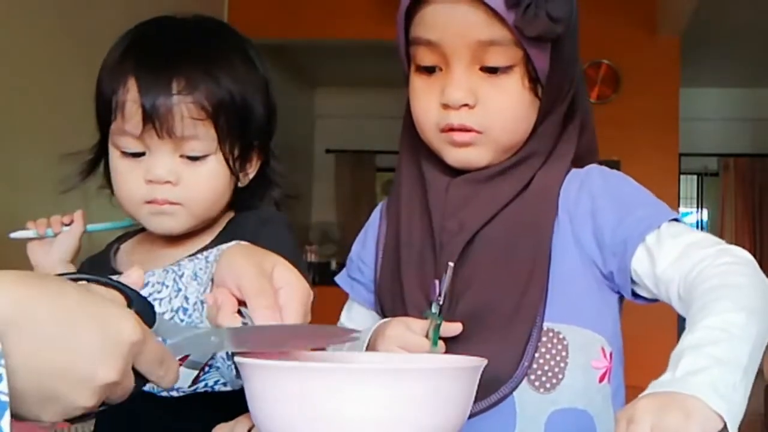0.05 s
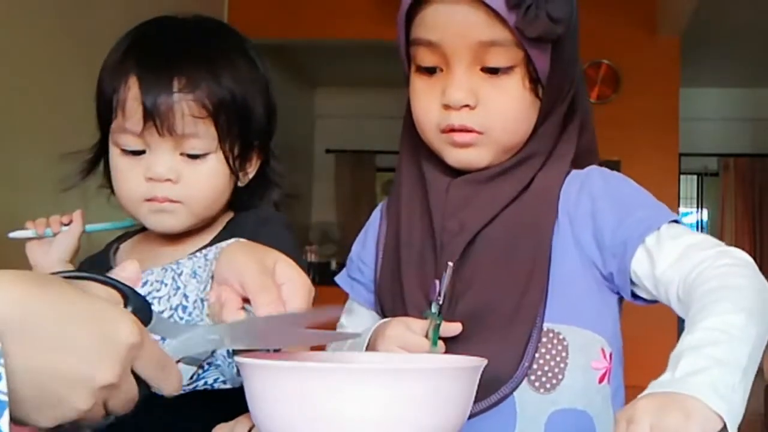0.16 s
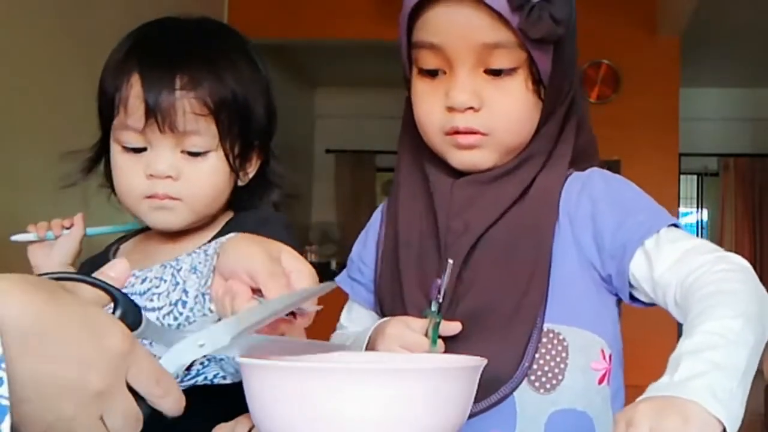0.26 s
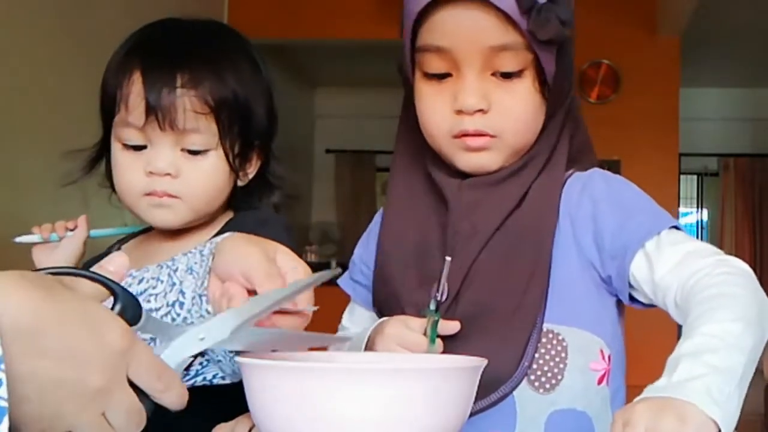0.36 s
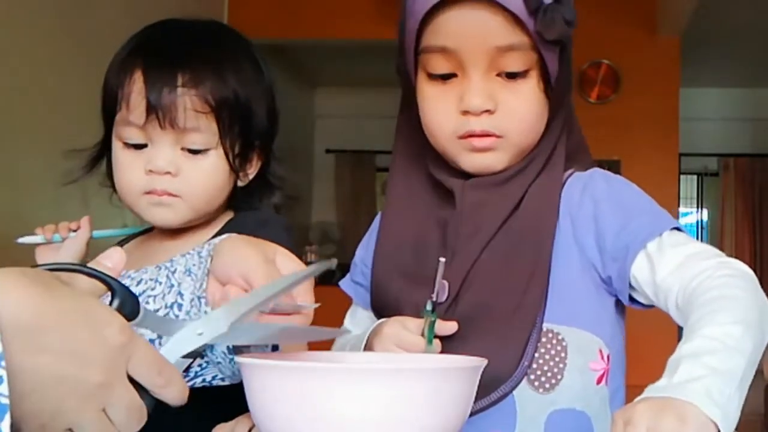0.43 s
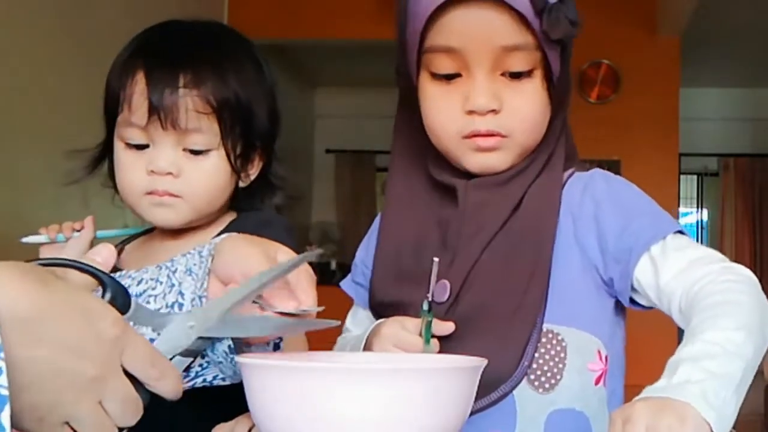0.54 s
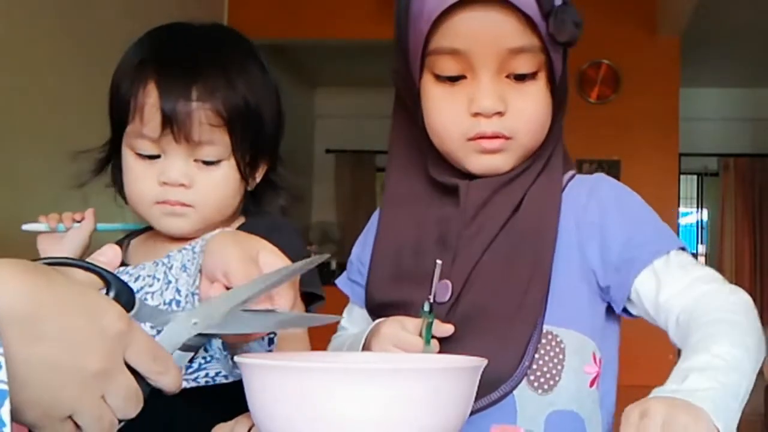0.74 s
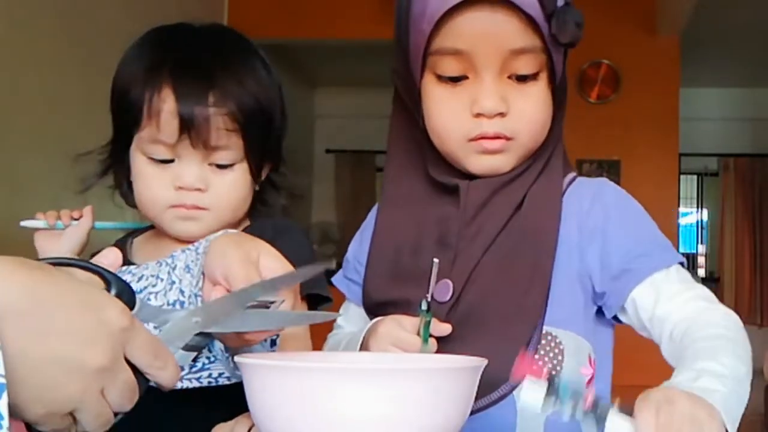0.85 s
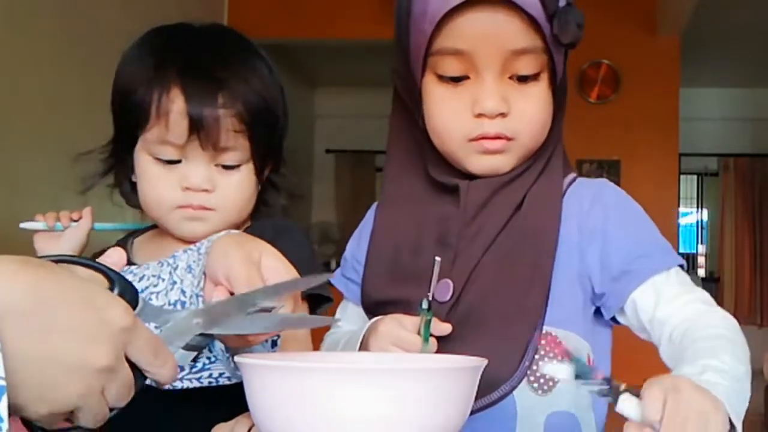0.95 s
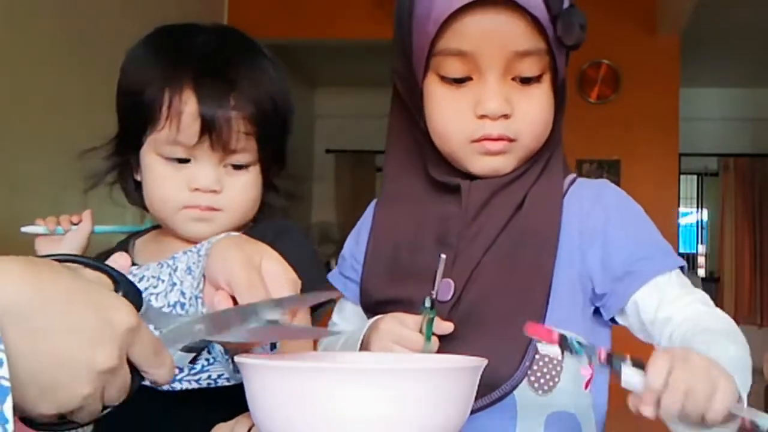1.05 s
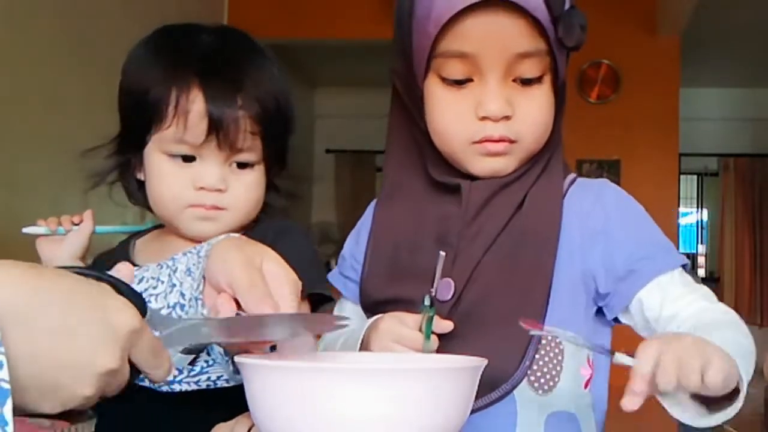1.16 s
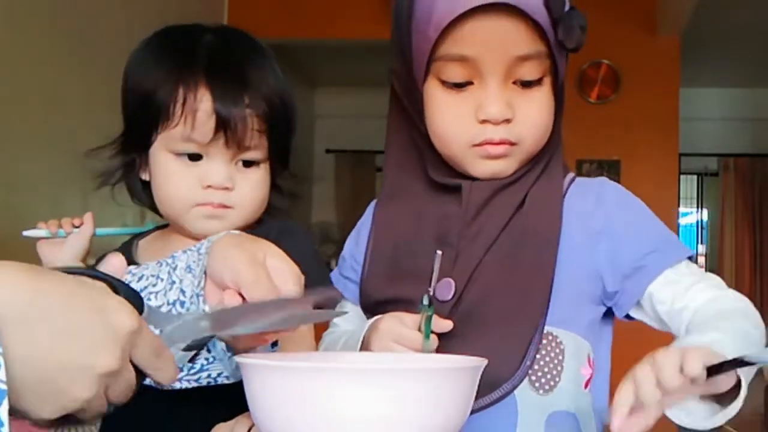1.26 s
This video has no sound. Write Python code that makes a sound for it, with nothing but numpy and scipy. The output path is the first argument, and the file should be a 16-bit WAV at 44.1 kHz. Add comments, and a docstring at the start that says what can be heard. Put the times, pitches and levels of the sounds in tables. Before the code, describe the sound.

Large scissors cut magazine paper close to the microphone: a brief paper brush and blade tick, two very loud, hollow, clipped knocks on the table, then light ticks, sliding and a crisp snip in a hard-walled room.

```python
"""A short brush and a soft bump, a blade tick, then two hard, hollow knocks that overload the microphone.
After them large steel scissors tick, slide along magazine paper and snip it, over a low room rumble.
Knocks are decaying sines plus a noise crack; ticks are noise rasps with a sine ping; paper is random
fibre snaps plus friction noise under stroke envelopes; hand bumps and rumble are coloured noise.
Knocks and scissors feed a diffuse reverberation of a hard-walled room; knocks also get early echoes."""
import sys
import numpy as np
from scipy import signal
from scipy.io import wavfile
from scipy.ndimage import uniform_filter1d

SR = 44100
rng = np.random.default_rng(int(sys.argv[2]) if len(sys.argv) > 2 else 0)


def store_wav(level_fs):
    """Save 16-bit WAV to argv[1]."""
    pcm = np.round(np.clip(np.atleast_2d(level_fs), -1, 1) * 32767)
    wavfile.write(sys.argv[1], SR, pcm.T.astype(np.int16))


N = 57330
T = np.arange(N) / SR
LN_60_DB = np.log(1000)


def from_db(db):
    """Decibels to amplitude gain."""
    return 10 ** (np.asarray(db) / 20)


def at_hz(points, hz):
    """Interpolate a table on a log-frequency axis."""
    f, value = np.transpose(points)
    return np.interp(np.log(hz), np.log(f), value)


def pan(db):
    """Left and right gains for a level difference; positive is louder left."""
    return from_db(np.array([[db], [-db]]) / 2)


def delay(x, s):
    """Shift a sound s seconds later, same length."""
    lag = int(max(s, 0) * SR)
    silence = np.zeros(x.shape[:-1] + (lag,))
    return np.concatenate([silence, x], axis=-1)[..., :N]


def decay(t60_s):
    """Exponential fall by 60 dB in t60_s."""
    return np.exp(-LN_60_DB * T / max(t60_s, 1e-3))


def ring(modes):
    """Decaying sines of a struck object."""
    return sum(from_db(db) * decay(t60) * np.sin(2 * np.pi * hz * T) for hz, db, t60 in modes)


def swell(start_s, peak_s, t60_s):
    """Straight rise, exponential release."""
    rise = np.clip((T - start_s) / max(peak_s - start_s, 1e-3), 0, 1)
    return rise * np.exp(-LN_60_DB * np.maximum(T - peak_s, 0) / t60_s)


BAND_EDGES_HZ = 22 * 2 ** (np.arange(30) / 3)  # third octaves
# stereo correlation: (f/Hz, left-right likeness)
STEREO_LIKENESS = [(60, 0.96), (150, 1), (300, 0.69), (1000, 0.23), (2500, 0), (10000, 0.12)]


def bands(white):
    """Split two mid/side pairs, used in turn, into third-octave stereo bands: (f/Hz, band)."""
    for k, (low, high) in enumerate(zip(BAND_EDGES_HZ, BAND_EDGES_HZ[1:])):
        band_pass = signal.butter(2, [low, high], "band", fs=SR, output="sos")
        mid, side = signal.sosfilt(band_pass, white[k % 2])
        hz = np.sqrt(low * high)
        alike = np.clip(at_hz(STEREO_LIKENESS, hz), -1, 1)
        opposed = side * np.array([[1], [-1]])
        yield hz, np.sqrt(1 + alike) * mid + np.sqrt(1 - alike) * opposed


def noise_bands():
    """Smooth stereo noise in third octaves."""
    return list(bands(rng.standard_normal((2, 2, N))))


def colour(bank, spectrum, tilt_db_per_oct=0):
    """Mix bands to a tilted spectrum, scaled to rms 1."""
    out = sum(from_db(at_hz(spectrum, hz) + tilt_db_per_oct * np.log2(hz)) * band for hz, band in bank)
    return out / out.std()


# blows: (t/s, hollow ring level/dB, crack level/dB, thud level/dB, ring brightness/dB per octave,
#         steel level/dB)
KNOCK_BLOWS = [(0.2165, 2, -6, 1.5, -1, -58), (0.2667, -4, -7, 4.5, -13, -35)]
# hollow ring of the struck object: (f/Hz, level/dB, t60/s)
HOLLOW_MODES = [(666.7, -19.5, 0.089), (788, -19.5, .16), (862.5, -16.5, 0.13), (966, -9, 0.14),
                (1024, -2, 0.05), (1120.3, -6, 0.062), (1233, -6, .07), (1405, -4, .06),
                (1810, -29.5, 0.027), (2020, -20, 0.062), (2700, -31, 0.07), (3130, -27, 0.09),
                (3900, -34, 0.071)]
# thud of the table top: (f/Hz, level/dB, t60/s)
TABLE_MODES = [(86, -34, .55), (163, -32, .45), (235, -31, .12), (308, -26, .25), (317, -32, .55)]
# long ring of the jolted steel: (f/Hz, level/dB, t60/s)
JOLTED_STEEL_MODES = [(3400, -10, .7), (3450, -11, .7), (3505, -5, .5), (4360, 3, .1), (4610, -5, .12),
                      (5790, -13, .25)]
# crack of the contact, relative spectrum: (f/Hz, level/dB per Hz)
CRACK_SPECTRUM = [(100, 5), (500, -3.5), (1200, 5.5), (2500, -5.5), (5500, -12.5), (8000, -29),
                  (12000, -37.5), (16000, -30)]
CRACK_T60_S, THUD_RISE_S, TILT_PIVOT_HZ = 0.045, 0.01, 1000
KNOCK_PAN_DB, KNOCK_RIGHT_LAG_S = 3.5, 0.00012


def knocks():
    """Two blows excite a noise crack, a hollow ring, a low thud and a thin steel ring."""
    crack = colour(noise_bands(), CRACK_SPECTRUM)
    thud = ring(TABLE_MODES) * (1 - np.exp(-T / THUD_RISE_S))
    out = 0
    for s, ring_db, crack_db, thud_db, bright_db, steel_db in KNOCK_BLOWS:
        modes = [(hz, db + bright_db * np.log2(hz / TILT_PIVOT_HZ), t60) for hz, db, t60 in HOLLOW_MODES]
        body = from_db(ring_db) * ring(modes) + from_db(thud_db) * thud
        stereo_body = np.array([delay(body, s), delay(body, s + KNOCK_RIGHT_LAG_S)])
        steel = from_db(steel_db) * delay(ring(JOLTED_STEEL_MODES), s)
        contact = from_db(crack_db) * crack * delay(decay(CRACK_T60_S), s)
        out = out + stereo_body + steel + contact
    return out * pan(KNOCK_PAN_DB)


# early reflections: (left delay t/s, right delay t/s, level/dB)
NEAR_REFLECTIONS = [(.0029, .0034, -14), (.0070, 0.021, -30), (.0096, .0104, -11.5),
                    (0.0134, 0.0079, -19.5)]


def echoes(x):
    """First reflections from the table and nearby things: delayed, weaker copies."""
    return sum(from_db(db) * np.array([delay(x[0], left_s), delay(x[1], right_s)])
               for left_s, right_s, db in NEAR_REFLECTIONS)


# blade ticks: (t/s, rasp level/dB, rasp length/s, rasp t60/s, tilt/dB per octave, pan/dB,
#               ping f/Hz, ping level/dB)
BLADE_TICKS = [(0.0447, -30, .003, .035, 4, -2, 4500, -37), (0.1938, -42, .003, .005, -2, -3, 2550, -32),
               (0.4378, -29, .002, .025, -1, 1, 1400, -32), (0.6024, -46, .003, .04, -2, 3, 3250, -46),
               (0.7662, -39, .002, .012, 0, 2, 3140, -42), (0.8035, -46, .002, .02, 0, 1, 3130, -50),
               (0.8850, -43, .002, .03, 0, 3, 5550, -43), (0.9605, -38, .001, .02, -1, 1, 2600, -42),
               (0.9744, -41, .002, .03, 0, 3, 4760, -37), (1.0968, -31, .005, .03, 1, 4, 3980, -38),
               (1.1497, -39, .002, .012, -3, 3, 2550, -34)]
# steel on steel, relative spectrum: (f/Hz, level/dB per Hz)
RASP_SPECTRUM = [(300, -9), (1500, -2.5), (2800, 17.5), (4200, 13), (7500, 14), (10000, 0), (15000, -5)]
PING_T60_S = 0.02


def ticks():
    """Blades catch on each other: a short noise rasp and a decaying sine ping."""
    bank, out = noise_bands(), 0
    for s, db, length_s, t60, tilt_db, pan_db, ping_hz, ping_db in BLADE_TICKS:
        envelope = np.exp(-LN_60_DB * np.maximum(T - length_s, 0) / t60)
        rasp = from_db(db) * colour(bank, RASP_SPECTRUM, tilt_db) * delay(envelope, s)
        ping = delay(ring([(ping_hz, ping_db, PING_T60_S)]), s)
        out = out + pan(pan_db) * (rasp + ping)
    return out


# strokes along and through the paper: (start t/s, peak t/s, release t60/s, level/dB, tilt/dB per octave)
BLADE_STROKES = [(-0.03, -0.011, 0.25, -36.5, 1.5), (0.80, 0.859, 0.58, -45.5, 0.5),
                 (0.945, 0.957, 0.1, -41.5, 1.5), (1.073, 1.081, 0.18, -36.5, 1),
                 (1.079, 1.103, 0.03, -43.5, 67.5), (1.15, 1.165, 0.42, -44.5, 0.5)]
# paper, relative spectrum: (f/Hz, level/dB per Hz)
PAPER_SPECTRUM = [(200, 10.5), (550, 8), (880, 6.5), (1300, 3.5), (1900, -1), (3300, 1.5), (5300, 3),
                  (7200, -2), (9300, -7)]
FIBRES_PER_S, FIBRE_SPREAD_DB, FRICTION_SHARE = 1500, 4.0, 0.6
PAPER_DULL_HZ, CUTTING_PAN_DB = 9500, 2.0
CATCH_SAMPLES, CATCH_RMS_DB = 180, 2.2  # paper catches and slips on the steel


def cutting():
    """Paper rubs on steel and its fibres snap at random under each stroke."""
    shape = (2, N)
    happens = rng.random(shape) < FIBRES_PER_S / SR
    sign = rng.choice([-1, 1], shape)
    strength = from_db(FIBRE_SPREAD_DB * np.minimum(rng.exponential(1, shape), 4))
    snaps = happens * sign * strength
    rubbing = snaps / snaps.std() + FRICTION_SHARE * rng.standard_normal((2, 2, N))
    low_pass = signal.butter(4, PAPER_DULL_HZ, fs=SR, output="sos")
    bank = list(bands(signal.sosfilt(low_pass, rubbing)))
    catching = uniform_filter1d(rng.standard_normal(N), size=CATCH_SAMPLES)
    catch_gain = from_db(CATCH_RMS_DB * catching / catching.std())
    strokes = sum(from_db(db) * swell(start, peak, t60) * colour(bank, PAPER_SPECTRUM, tilt_db)
                  for start, peak, t60, db, tilt_db in BLADE_STROKES)
    return pan(CUTTING_PAN_DB) * catch_gain * strokes


# blade ring on shutting: (f/Hz, level/dB, t60/s)
SHUT_MODES = [(870, -8, .04), (3280, -7, .07), (3990, -1, .04), (6820, -14, .04), (7980, -14, .04)]
SHUT_S, SHUT_DB, SHUT_PAN_DB = 1.0968, -31, 4


def shutting():
    """Blades ring briefly as they shut, close to the microphone: no reverberation."""
    return pan(SHUT_PAN_DB) * from_db(SHUT_DB) * delay(ring(SHUT_MODES), SHUT_S)


# hands shifting on the table: (start t/s, peak t/s, release t60/s, level/dB)
HAND_BUMPS = [(-0.02, -0.007, 0.18, -31.5), (0.822, 0.8, 1, -45), (1.088, 1.104, 0.57, -48),
              (1.184, 1.189, 0.41, -47)]
# hands, relative spectrum: (f/Hz, level/dB per Hz)
HAND_SPECTRUM = [(30, 13), (60, 5), (100, 5.5), (200, 14), (310, -18.5), (450, -11), (1500, -43),
                 (6000, -80)]


def handling():
    """Soft, low bumps of the hands: enveloped dark noise."""
    envelope = sum(from_db(db) * swell(start, peak, t60) for start, peak, t60, db in HAND_BUMPS)
    return colour(noise_bands(), HAND_SPECTRUM) * envelope


# reverberation level: (f/Hz, level/dB)
ROOM_SPECTRUM = [(40, -35), (100, 2), (300, -3.5), (500, -11.5), (950, -5), (1400, -9.5), (2200, -5),
                 (3500, -8.5), (7000, -5.5), (14000, -9)]
# reverberation time: (f/Hz, t60/s)
ROOM_DECAY = [(80, 0.3), (300, 0.84), (1000, 0.71), (2000, 0.68), (3500, 0.92), (7000, 0.44), (14000, 0.12)]
ROOM_BUILD_S = 0.0072


def room(x):
    """Diffuse reverberation: noise that builds up and dies band by band, fed in mono."""
    response = 0
    for hz, band in noise_bands():
        shape = decay(at_hz(ROOM_DECAY, hz)) * (1 - np.exp(-(T / ROOM_BUILD_S) ** 2))
        response = response + from_db(at_hz(ROOM_SPECTRUM, hz)) * band * shape / np.linalg.norm(shape)
    mono = x.mean(axis=0)[None]
    return signal.fftconvolve(mono, response, axes=1)[:, :N]


# background, relative spectrum: (f/Hz, level/dB per Hz)
RUMBLE_SPECTRUM = [(15, -39), (25, -2.5), (78, 1), (229, -3), (344, -6), (427, -18), (560, -21),
                   (840, -11.5), (1520, -13.5), (2280, -59), (3080, -24), (5280, -31), (6560, -30),
                   (16000, -50.5)]
RUMBLE_RMS_DB = -44.5


def rumble():
    """Steady low room rumble: coloured noise."""
    return from_db(RUMBLE_RMS_DB) * colour(noise_bands(), RUMBLE_SPECTRUM)


KNOCK_ROOM_DB, SCISSORS_ROOM_DB = -2.5, -1  # reverberation sends
SCISSORS_RIGHT_LAG_S = 0.0005


def scene():
    """Knocks and scissors in the room, over the background."""
    blows = knocks()
    left, right = ticks() + cutting()
    scissors = np.array([left, delay(right, SCISSORS_RIGHT_LAG_S)])
    reverb = room(from_db(KNOCK_ROOM_DB) * blows + from_db(SCISSORS_ROOM_DB) * scissors)
    return blows + echoes(blows) + scissors + shutting() + reverb + handling() + rumble()


LOW_CUT_HZ, CLIP_LEVEL, CUTOFF_HZ = 30, 1.0, 15500


def record(dry):
    """Deepest bass rolls off, loudest peaks clip flat, the top is cut."""
    high_pass = signal.butter(1, LOW_CUT_HZ, "high", fs=SR, output="sos")
    thinned = signal.sosfilt(high_pass, dry)
    clipped = np.clip(thinned, -CLIP_LEVEL, CLIP_LEVEL)
    low_pass = signal.ellip(10, 0.1, 70, CUTOFF_HZ, fs=SR, output="sos")  # ripple/dB, stopband/dB
    return signal.sosfilt(low_pass, clipped)


dry = scene()
out = record(dry)
store_wav(out)
```